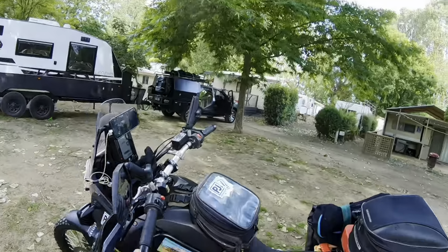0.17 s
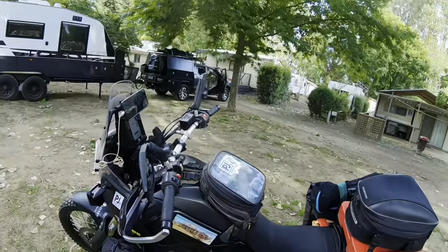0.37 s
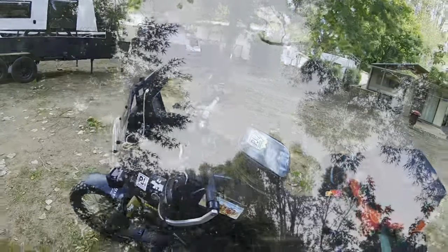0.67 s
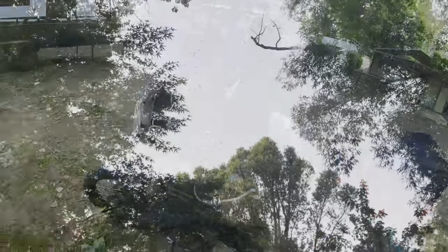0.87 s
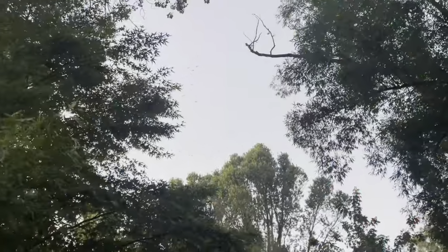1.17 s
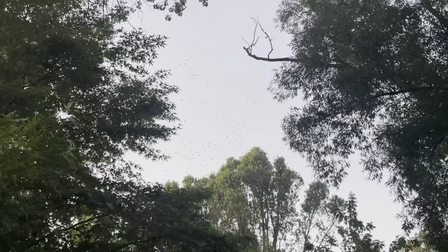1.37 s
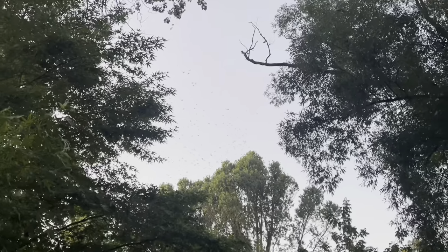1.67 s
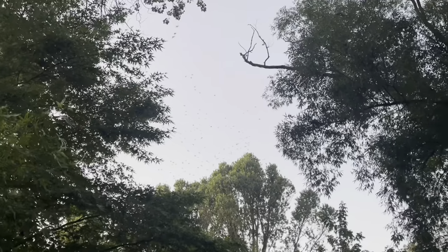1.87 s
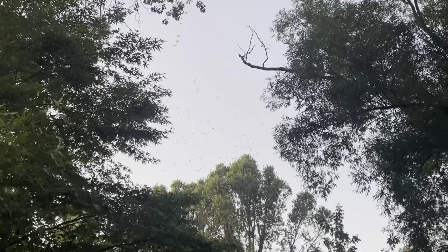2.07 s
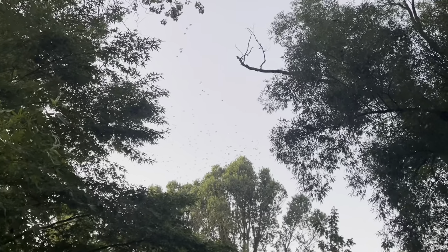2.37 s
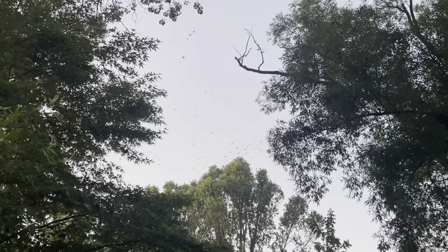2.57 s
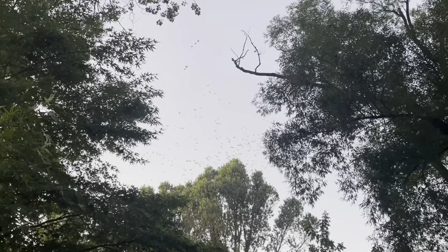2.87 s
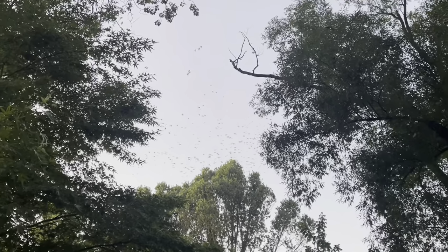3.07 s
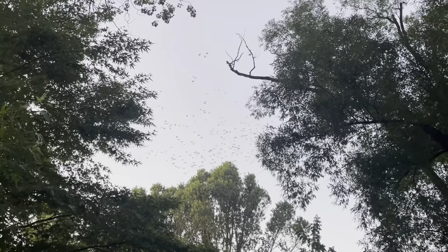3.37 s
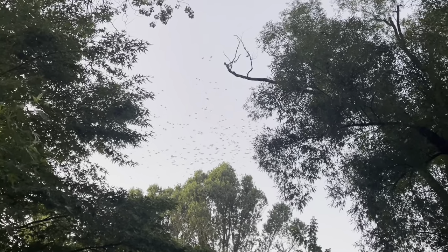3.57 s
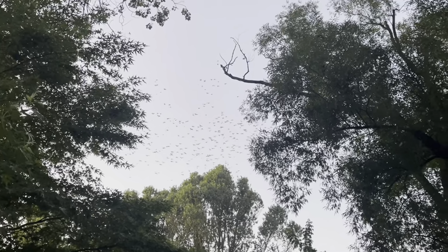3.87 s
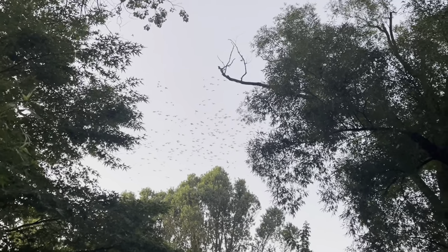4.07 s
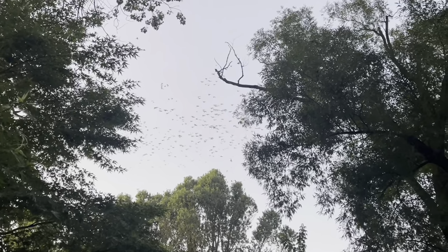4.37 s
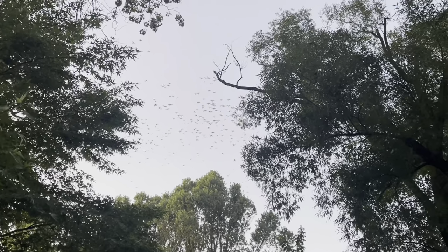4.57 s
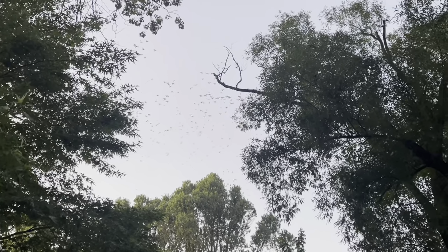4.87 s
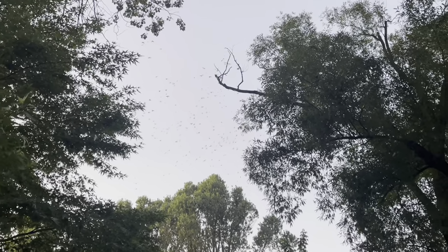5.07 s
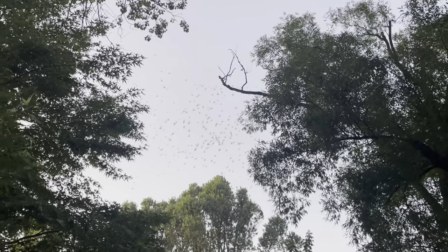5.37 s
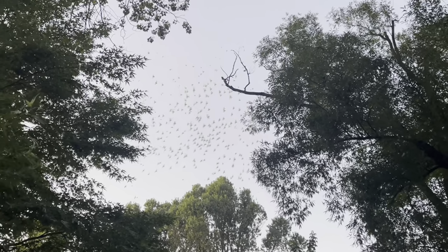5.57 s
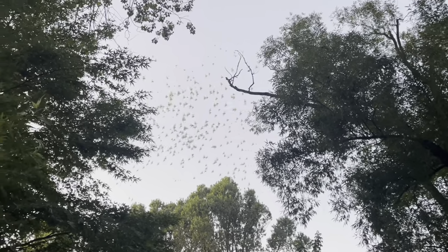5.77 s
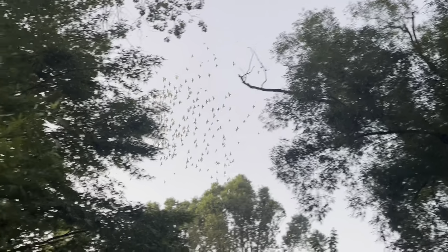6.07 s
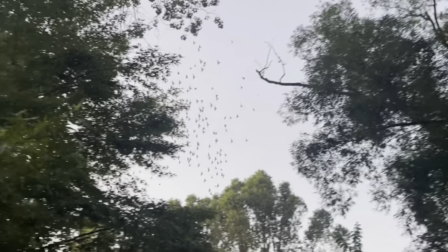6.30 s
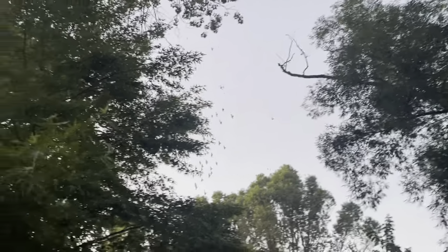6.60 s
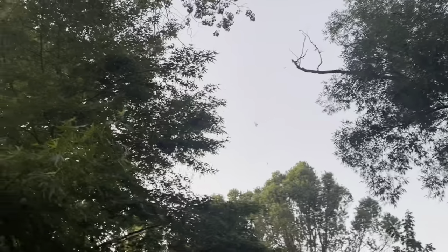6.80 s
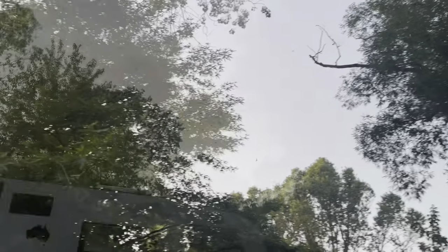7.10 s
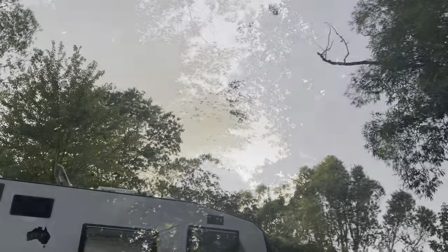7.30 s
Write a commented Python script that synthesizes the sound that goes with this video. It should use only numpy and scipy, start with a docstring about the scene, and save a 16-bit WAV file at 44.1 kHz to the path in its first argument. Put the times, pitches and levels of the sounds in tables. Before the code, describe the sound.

A big flock of cockatoos screeches high above a wooded campsite, heard in stereo on a hand-held phone. The din takes over from a brief opening of a nearby motorcycle idling, with ticking valves and rustling gear. A few closer warbles stand out, and later the flock eases while near birds give a run of raspy squawks. Light wind and distant traffic rumble faintly underneath, and a sharp handling knock comes near the end.

```python
"""A big flock of cockatoos screeches high over a campsite, each voice a pulse train shaped by the throat.
At first a motorcycle idles close by: firings ring the exhaust, valves clatter and gear rustles.
It fades out as the flock fades in, and near birds warble and squawk over the crowd.
A hand-held phone hears it in stereo at two microphone ports; its audio coding marks the high treble.
Hands bump the phone now and then over a low rumble of light wind and far traffic."""
import sys
import numpy as np
from scipy import signal
from scipy.fft import rfft, irfft
from scipy.io import wavfile
from scipy.ndimage import uniform_filter1d

SR = 44100
rng = np.random.default_rng(int(sys.argv[2]) if len(sys.argv) > 2 else 0)


def wrap_up_sound(samples):
    """Save the sound to the file named by the first command line argument, as 16-bit audio."""
    columns = np.atleast_2d(samples).T
    # keep every value between -1 and 1, then stretch to whole-number steps
    tamed = np.clip(columns, -1, 1)
    steps = np.round(tamed * 32767).astype(np.int16)
    wavfile.write(sys.argv[1], SR, steps)


N = 328104
T = np.arange(N) / SR
BIN_HZ = np.arange(N // 2 + 1) * SR / N


def undb(db):
    """Decibels to amplitude ratio."""
    return 10 ** (np.asarray(db) / 20)


def level(x, db=0):
    """Normalisation to an RMS level."""
    return x * undb(db) / np.sqrt(np.mean(x ** 2))


def curves(table):
    """Linear interpolation of columns over time."""
    time_s, *columns = np.transpose(table)
    return [np.interp(T, time_s, c) for c in columns]


def over_hz(table):
    """Interpolation of columns over log frequency."""
    hz, *columns = np.transpose(table)
    return [np.interp(np.log(BIN_HZ + 1), np.log(hz), c) for c in columns]


def band(x, lo_hz, hi_hz, order=2):
    """Butterworth band-pass."""
    return signal.sosfilt(signal.butter(order, [lo_hz, hi_hz], "band", fs=SR, output="sos"), x)


def wobble(corner_hz):
    """Random modulation: low-passed noise of unit RMS."""
    return level(signal.lfilter([1], [1, -np.exp(-2 * np.pi * corner_hz / SR)], rng.standard_normal(N)))


def swell(start, attack, hold, release):
    """Trapezoidal envelope, 0 to 1."""
    return np.clip(np.minimum((T - start) / attack, (start + attack + hold + release - T) / release), 0, 1)


def ring(start_s, hz, t60_s):
    """Free vibration of one mode: a damped sine."""
    out, t = np.zeros(N), T[T < 1.5 * t60_s]
    at = int(start_s * SR) + np.arange(len(t))
    out[at[at >= 0]] = (np.sin(2 * np.pi * hz * t) * np.exp(-np.log(1000) * t / t60_s))[at >= 0]
    return out


def exhaust():
    """Pipe resonance: each firing sucks, then rings the modes; a weaker beat follows and gas roars."""
    # idle beats: start_s, gain_db
    firings = [(-.04, -19), (0.04, -20.5), (0.117, -23), (0.198, -20), (0.286, -22.5), (0.372, -20.5),
               (0.456, -20.5), (0.542, -21.5), (0.623, -21.5), (0.708, -24), (0.795, -29), (0.885, -31.5)]
    # exhaust resonances: pitch_hz, gain_db, t60_s
    modes = [(59.2, -12.5, 0.46), (88, -17, 0.18), (131, 3, 0.064), (244, -0.5, 0.033)]
    beats = np.zeros(N)
    for start_s, firing_db in firings:
        for late_s, beat_db in [(.005, -.5), (.023, -5.5)]:
            for hz, mode_db, t60_s in modes:
                gain = undb(firing_db + beat_db + mode_db + rng.normal(0, 1))
                beats -= gain * ring(start_s + late_s, hz, t60_s)
    roar = level(band(rng.standard_normal(N), 54, 171), -37.5) * np.clip((.98 - T) / .41, 0, 1)
    return undb(3.5) * band(beats, 43, 246, order=3) + roar


def clatter():
    """Impact noise: valves and gear excite broad resonances, with rustles and single ticks."""
    # rustles of gear: start_s, body_hold_s, body_db, treble_db, treble_hold_s
    rustles = [(-.03, 0.027, -53, -81, 0.036), (0.21, 0.034, -56, -74, 0.027),
               (0.453, 0.062, -52.5, -64, 0.024)]
    # what the clatter rings in: centre_hz, width_hz, relative_db
    resonances = [(497, 76, -10), (1290, 1800, 17), (2630, 790, 0)]
    # sharp impacts: start_s, gain_db, pitch_hz
    impacts = [(.127, -50, 2000), (.178, -56, 7800), (.221, -33, 3050), (.223, -42, 1500),
               (.250, -44, 3100), (.256, -44, 1300), (.262, -42, 2600), (.266, -45, 3300),
               (.462, -60, 10000), (.476, -43, 4300), (.477, -50, 8500), (.478, -45, 2300),
               (.497, -44, 1300), (.509, -38, 1250), (.511, -38, 1800)]
    body_gain, treble_gain = undb(-57), undb(-82)  # steady valve clatter
    for start_s, body_hold_s, body_db, treble_db, treble_hold_s in rustles:
        body_gain += undb(body_db) * swell(start_s, .013, body_hold_s, .018) ** 2
        treble_gain += undb(treble_db) * swell(start_s, .013, treble_hold_s, .018) ** 2
    grain = rng.standard_normal((2, N)) * undb(1.4 * wobble(60))
    body = sum(level(band(grain[0], hz - width / 2, hz + width / 2), db) for hz, width, db in resonances)
    rattle = body_gain * level(body) + treble_gain * level(band(grain[1], 5000, 9500, order=3))
    ticks = sum(undb(db) * band(ring(s, hz, .007), .7 * hz, 1.3 * hz, order=1) for s, db, hz in impacts)
    return rattle * np.clip((.7 - T) / .12, 0, 1) + ticks


def screech(hz, grit, air, rasp, breath, ratio):
    """Pulsed airflow: harmonics fall by a fixed ratio, amplitude rasps, breath hisses once a cycle."""
    phase = np.cumsum(2 * np.pi * hz / SR)
    pulses = (1 - ratio ** 2) / (1 + ratio ** 2 - 2 * ratio * np.cos(phase))
    return (pulses - 1) * (1 + rasp * grit) + breath * pulses * air


def far_birds(count, spread, hoarsest, pitch_hz=790):
    """Superposition of short screeches, each frequency-modulated by an arch, a glide and a warble."""
    out, shake, grit, air = np.zeros(2 * N), wobble(58.5), wobble(580), rng.standard_normal(N)
    uniform, normal = rng.random((count, 6)), rng.standard_normal((count, 3))
    for k in range(count):
        length, delay, pick, roughness, pace, phase = uniform[k]
        detune, glide, size = normal[k]
        n, at = int(SR * (.04 + .1 * length)), int((k + delay) / count * N)
        part = int(pick * (N - SR)) + np.arange(n)
        progress, hoarse = np.arange(n) / n, hoarsest * roughness
        arch = .06 * (np.sin(np.pi * progress) - .6) + .05 * glide * progress
        warble = .03 * np.sin(2 * np.pi * ((6 + 8 * pace) * T[:n] + phase))
        jitter = (.012 + .04 * hoarse) * shake[part]
        hz = pitch_hz * (1 + spread * detune) * (1 + arch + warble + jitter)
        rasp = .2 + .5 * hoarse
        voice = screech(hz, grit[part], air[part], rasp, breath=rasp, ratio=.82)
        envelope = np.minimum(5 * progress, 1) * np.sqrt(1 - progress)
        out[at:at + n] += undb(2.5 * size) * envelope * voice
    return out[:N] + out[N:]  # late calls wrap to the start


def trees(spread_s, bins):
    """Scattering by leaves: an all-pass response with random group delay."""
    steps = np.repeat(rng.standard_normal(N // (2 * bins) + 2), bins)
    delay_s = spread_s * uniform_filter1d(steps, size=bins)[:N // 2 + 1]
    return np.exp(-2j * np.pi * np.cumsum(delay_s) * SR / N)


def flicker(rms_db):
    """Level fluctuation as birds join and drop out."""
    return rms_db * level(uniform_filter1d(wobble(9.4), size=SR // 40))


def even(x, db):
    """Running RMS normalisation: the crowd follows db without pauses."""
    return x * undb(db) / np.sqrt(uniform_filter1d(x ** 2, size=SR // 11, mode="wrap"))


def crowd_spectra():
    """Source and filter: two independent crowds share one colour and level contour."""
    # crowd contour: time_s, mid_db, treble_re_mid_db, low_re_mid_db
    contour = [(.6, -41.5, -12.5, -14), (.8, -32.5, -14, -16), (.96, -32, -11.5, -14.5),
               (1.31, -30, -13, -14.5), (1.56, -33.5, -12.5, -16.5), (1.79, -30.5, -11.5, -21.5),
               (2.2, -32.5, -15.5, -16.5), (2.5, -31, -11.5, -16.5), (2.96, -31.5, -12.5, -16),
               (3.1, -29.5, -12, -16.5), (3.99, -29.5, -10, -16.5), (4.22, -26.5, -9.5, -19),
               (4.78, -29.5, -11, -17), (5.08, -36.5, -8, -16), (5.3, -35.5, -7.5, -12.5),
               (5.5, -40, -5.5, -13.5), (5.61, -39, -10.5, -15), (5.7, -34, -7, -15),
               (5.85, -32.5, -3, -11.5), (6.04, -32.5, -10, -14.5), (6.41, -29, -11.5, -18.5),
               (6.6, -33, -13, -14), (6.72, -28, -12, -13.5), (7.0, -32, -14, -16),
               (7.36, -35.5, -8.5, -18), (7.44, -35, -2, -13.5)]
    # response of throat, beak and air: frequency_hz, gain_db
    throat = [(250, -39), (520, -18), (780, -17), (1150, -15), (1600, -13), (2000, -7.5), (2400, -2.5),
              (2900, -7), (3700, -13), (4500, -12.5), (4850, -9), (5100, -8.5), (5600, -9), (7000, -8.5),
              (8500, -13.5), (10000, -11), (11200, -20), (12000, -51)]
    mid_db, treble_db, low_db = (c + flicker(db) for c, db in zip(curves(contour), (.41, 1.3, .5)))
    # the band above 11.2 kHz opens when the flock is loud, as in an audio coder
    top_db = treble_db - 27 + 2.7 * (mid_db + treble_db + 38)
    bands = [(0, 1150, low_db), (1150, 4800, 0), (4800, 11200, treble_db), (11200, SR, top_db)]
    colour = undb(over_hz(throat)[0])
    colour /= colour.max()
    fade = swell(.52, .094, T[-1] - .575, .0035)
    spectra = []
    for _ in range(2):
        low_fliers = undb(5) * band(far_birds(110, spread=.1, hoarsest=.15), 2800, 5600)
        voices = far_birds(560, spread=.078, hoarsest=1) + low_fliers
        spectrum = rfft(voices) * colour * trees(.01, bins=1500)
        crowd = sum(even(irfft(spectrum * ((BIN_HZ >= lo) & (BIN_HZ < hi)), N), mid_db + db)
                    for lo, hi, db in bands)
        spectra.append(rfft(crowd * fade))
    return spectra


def crack(depth_db=3):
    """Random amplitude modulation of a breaking voice, one second long."""
    drift = level(uniform_filter1d(wobble(30)[:SR], size=SR // 70))
    return level(undb(depth_db * np.minimum(drift, 1)))


def call(hz, db, formant_hz, upper_db, hoarse, noises):
    """Formant filtering: a near bird's throat resonance and two fixed bands each crack on their own."""
    shake, grit, air = noises
    voice = screech(hz * (1 + .025 * hoarse * shake), grit, air, hoarse, breath=.45 * hoarse, ratio=.85)
    formants = [band(voice, .8 * formant_hz, 1.25 * formant_hz, order=3),
                undb(-12) * band(voice, 1300, 1900, order=3),
                undb(upper_db) * band(voice, 2800, 4500)]
    t = T[:len(hz)]
    fade = np.clip(np.minimum(t, t[::-1]) / .015, 0, 1)
    return fade * undb(db) * sum(crack()[:len(hz)] * formant for formant in formants)


def near_birds(slowing_s=1.2):
    """Frequency modulation: warbles slow down and pulse at each pitch crest; squawks dip and rise."""
    # warbling calls: start_s, length_s, first_hz, last_hz, depth_hz, first_rate_hz,
    # formant_hz, gain_db, upper_band_db
    warbles = [(2.82, .12, 945, 920, 22, 19, 1900, -32, -13),
               (3.505, .41, 1000, 925, 28, 24, 2000, -32, -6), (4.15, .17, 820, 830, 24, 11, 2500, -36, -6),
               (7.36, .08, 850, 800, 20, 12, 2600, -43, -4)]
    # single squawks: formant_hz, upper_band_db, hoarseness (0-1), [(time_s, pitch_hz, gain_db)]
    squawks = [(1450, -5, .7, [(0, 730, -59), (.04, 715, -61), (.08, 735, -60), (.11, 725, -66)]),
               (3900, -10, .5, [(3.5, 950, -44), (3.53, 1000, -38), (3.57, 960, -37), (3.61, 985, -38),
               (3.66, 940, -44)]), (2400, -4, .27, [(4.88, 770, -40), (4.93, 810, -35), (4.99, 790, -35),
               (5.02, 815, -38), (5.055, 745, -34), (5.09, 790, -36), (5.13, 850, -38), (5.155, 750, -37),
               (5.19, 720, -37), (5.225, 740, -40), (5.245, 780, -34), (5.275, 795, -32), (5.3, 810, -46)]),
               (2500, -4, .3, [(5.38, 765, -42), (5.4, 780, -40), (5.42, 845, -35), (5.45, 790, -40),
               (5.49, 750, -39), (5.52, 790, -42), (5.545, 870, -38), (5.565, 850, -48)]),
               (2700, -10, .35, [(5.4, 890, -46), (5.42, 930, -35), (5.445, 895, -46)]),
               (2900, -6, .35, [(5.7, 700, -40), (5.75, 765, -36), (5.78, 790, -35), (5.81, 700, -35),
               (5.83, 660, -42)]), (3300, -6, .45, [(5.8, 880, -42), (5.82, 840, -37), (5.85, 760, -38),
               (5.87, 850, -37), (5.93, 830, -38), (5.95, 800, -44)]), (2600, -2, .4, [(5.69, 770, -40),
               (5.72, 735, -36), (5.745, 790, -35), (5.77, 870, -34), (5.79, 775, -35), (5.825, 685, -36),
               (5.84, 700, -44)]), (2400, -12, .6, [(5.8, 880, -38), (5.83, 820, -32), (5.855, 755, -33),
               (5.885, 790, -30), (5.92, 840, -31), (5.94, 780, -36), (5.96, 795, -32), (5.985, 765, -30),
               (6.01, 770, -42)]), (2100, -14, .35, [(6.02, 690, -40), (6.04, 690, -33), (6.08, 710, -33),
               (6.11, 655, -34), (6.135, 650, -42)]), (2800, -14, .45, [(6.07, 680, -42), (6.11, 740, -37),
               (6.14, 680, -36), (6.2, 720, -36), (6.23, 700, -42)])]
    out, noises = np.zeros(N), np.array([wobble(94), wobble(350), rng.standard_normal(N)])
    for start_s, length_s, first_hz, last_hz, depth_hz, rate_hz, formant_hz, db, upper_db in warbles:
        on = (T > start_s) & (T < start_s + length_s)
        t = T[on] - start_s
        turns = rate_hz * slowing_s * (1 - np.exp(-t / slowing_s))
        hz = first_hz + (last_hz - first_hz) * t / length_s - depth_hz * np.cos(2 * np.pi * turns)
        pulse = .25 + .75 * np.sin(np.pi * turns) ** 2
        out[on] += pulse * call(hz, db, formant_hz, upper_db, .45, noises[:, on])
    for formant_hz, upper_db, hoarse, shape in squawks:
        on = (T > shape[0][0]) & (T < shape[-1][0])
        hz, db = (uniform_filter1d(c, size=SR // 80)[on] for c in curves(shape))
        out[on] += call(hz, db, formant_hz, upper_db, hoarse, noises[:, on])
    return out


def flock():
    """Partial coherence: one crowd and the near birds form the mid signal, the other the side."""
    # stereo image of the flock: frequency_hz, left_lead_half_turns, coherence (0-1)
    # the flat 8.5-9.55 kHz stretch is audio coding
    stereo_image = [(170, 0, .85), (860, .09, .68), (1250, 0, .85), (1800, .06, .98), (2300, .15, .86),
                    (2900, .38, .76), (3950, .26, .8), (4650, .69, .79), (5000, 1.2, .8), (5350, 1.66, .86),
                    (5750, 1.97, .97), (6150, 2.01, .995), (6400, 2.15, .92), (8200, 2.78, .87),
                    (8500, 3, 1), (9550, 3, 1), (9800, 3.17, .88), (10850, 3.5, .78), (11250, 3.7, .7),
                    (11700, 4, .95)]
    lead, coherence = over_hz(stereo_image)
    first_crowd, second_crowd = crowd_spectra()
    near = rfft(near_birds()) * trees(.002, bins=3000)
    mid = (first_crowd + near) * np.sqrt((1 + coherence) / 2)
    side = second_crowd * np.sqrt((1 - coherence) / 2)
    turn = np.exp(.5j * np.pi * lead)
    return np.array([irfft((mid + side) * turn, N), irfft((mid - side) / turn, N)])


def rumble():
    """Turbulence at the ports and far traffic: low noise bands, partly coherent between channels."""
    # puffs of wind: middle_s, length_s, peak_db
    puffs = [(.93, 0.064, -59), (1.135, 0.056, -41), (1.346, 0.068, -41), (1.447, 0.23, -63),
             (1.855, 0.74, -60), (2.19, .15, -73), (3.168, 0.98, -64), (3.67, .14, -59), (3.806, .08, -57),
             (3.975, 0.29, -52), (4.34, .3, -64), (4.714, .3, -68), (5.17, 0.32, -67), (6.04, 0.16, -67),
             (6.5, .05, -63), (6.984, 0.059, -49), (7.037, .05, -59), (7.366, 0.18, -69)]
    # far traffic: time_s, level_db
    traffic = [(1.0, -58), (1.61, -64), (1.82, -52), (2.09, -65), (2.49, -58), (2.87, -67), (3.58, -62),
               (3.76, -65.5), (3.94, -65), (4.21, -60.5), (4.51, -67), (5.1, -60.5), (5.8, -61), (6.3, -56),
               (6.55, -56), (6.85, -57), (7.26, -66.5), (7.44, -69)]
    wind = undb(-70) + sum(undb(db) * swell(s - span / 2, span / 2, 0, span / 2) ** 2
                           for s, span, db in puffs)
    traffic_db = curves(traffic)[0] + 2 * wobble(5.8)
    noise = rng.standard_normal((4, N)) * undb(.96 * wobble(21))
    mid = wind * level(band(noise[0], 40.6, 90, order=3)) + level(band(noise[1], 122, 362), traffic_db)
    side = wind * level(band(noise[2], 40, 100), -14) + level(band(noise[3], 130, 330), traffic_db - 13)
    return np.array([mid + side, mid - side]) * np.clip((T - .7) / .25, 0, 1)


def hand_bumps():
    """Structure-borne sound: each bump rings the phone briefly."""
    # bumps of the hand: start_s, gain_db, pitch_hz, t60_s
    bumps = [(1.345, -35, 130, .08), (1.595, -36, 700, .02), (1.88, -44, 150, .06), (2.53, -44, 250, .04),
             (3.65, -46, 100, .08), (4.7, -46, 150, .06), (6.04, -44, 110, .08), (7.0103, -16, 800, .012),
             (7.014, -42, 300, .03), (7.022, -42, 130, .05)]
    return sum(undb(db) * band(ring(s, hz, t60_s), .7 * hz, 1.35 * hz) for s, db, hz, t60_s in bumps)


def scene():
    """Superposition of all sources, in stereo."""
    return flock() + exhaust() + clatter() + rumble() + hand_bumps()


def record(dry):
    """Band limiting: the phone cuts the top above 12.3 kHz."""
    return signal.sosfilt(signal.ellip(8, .2, 70, 12300, fs=SR, output="sos"), dry)


dry = scene()
out = record(dry)
wrap_up_sound(out)
```